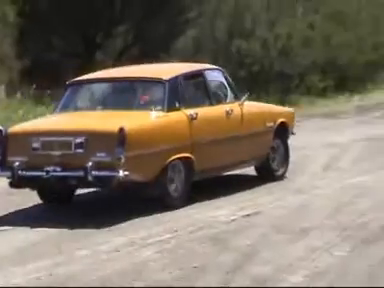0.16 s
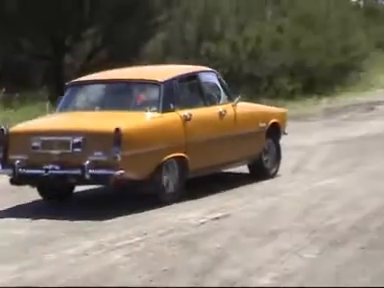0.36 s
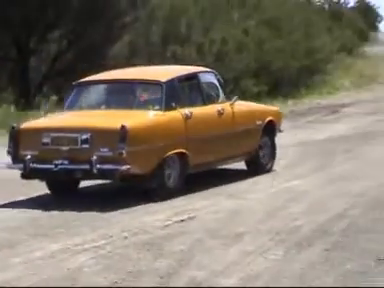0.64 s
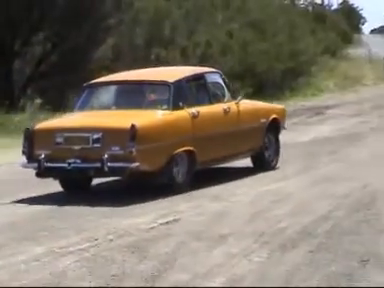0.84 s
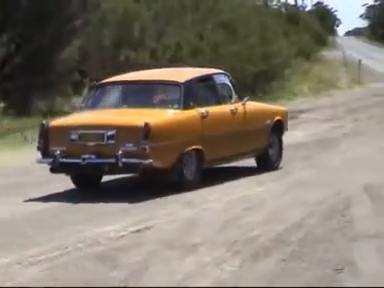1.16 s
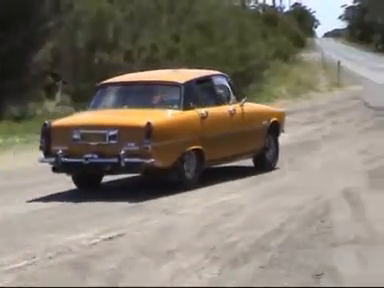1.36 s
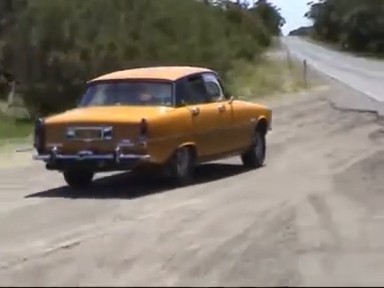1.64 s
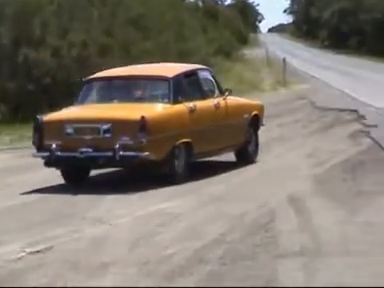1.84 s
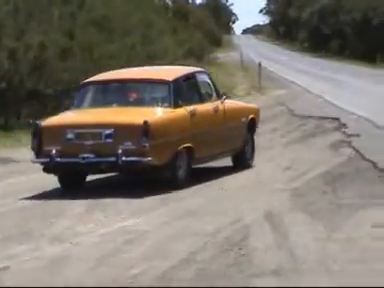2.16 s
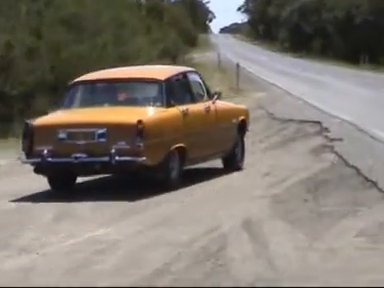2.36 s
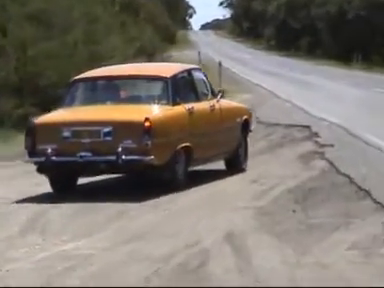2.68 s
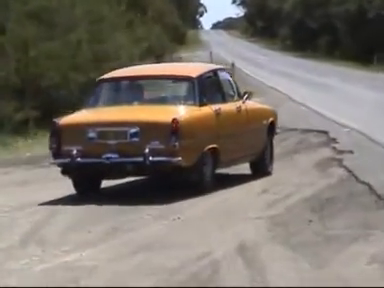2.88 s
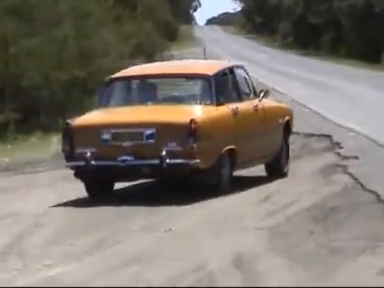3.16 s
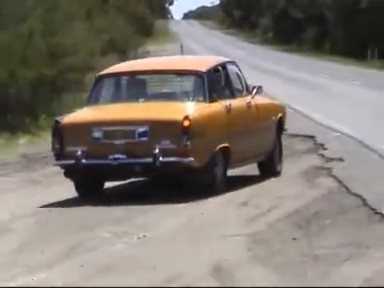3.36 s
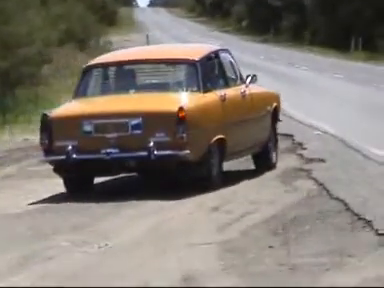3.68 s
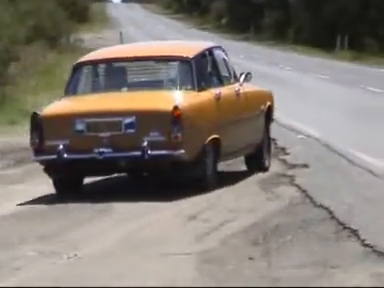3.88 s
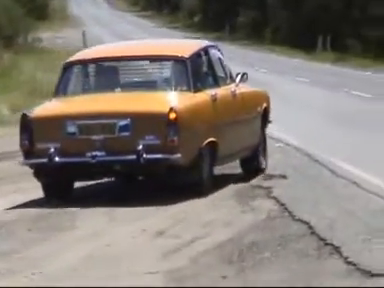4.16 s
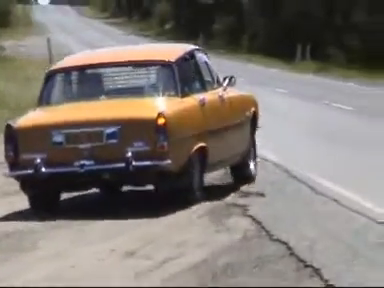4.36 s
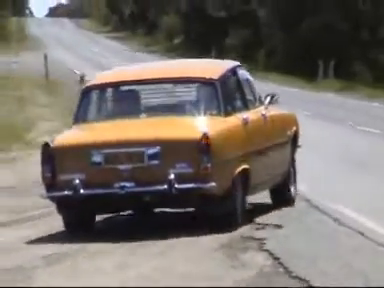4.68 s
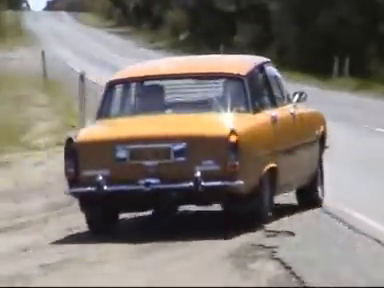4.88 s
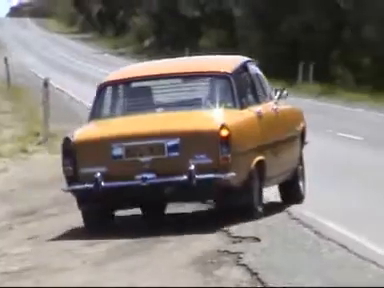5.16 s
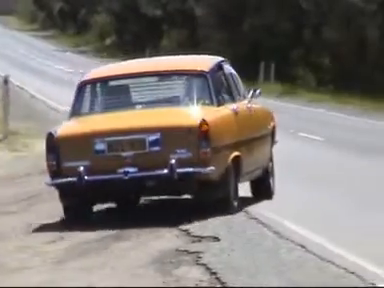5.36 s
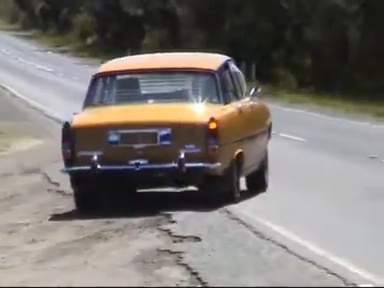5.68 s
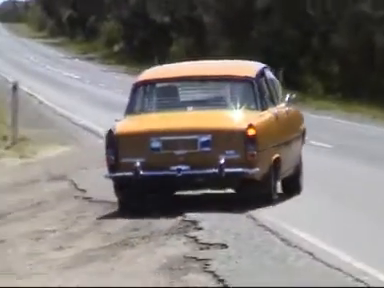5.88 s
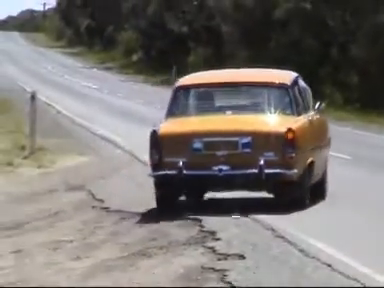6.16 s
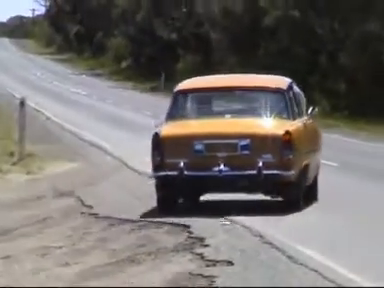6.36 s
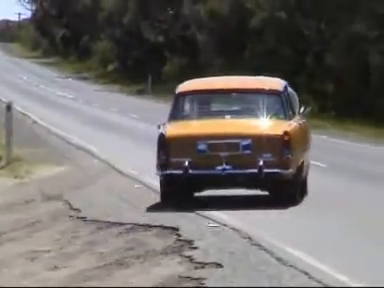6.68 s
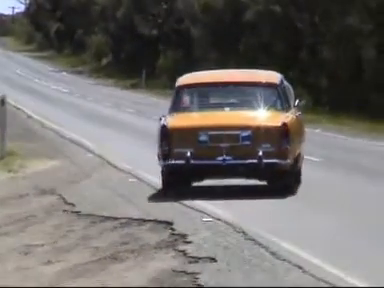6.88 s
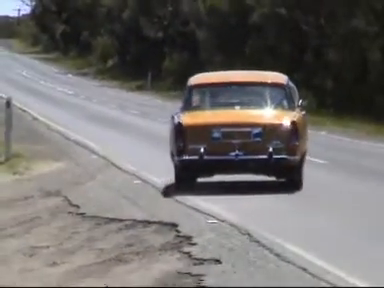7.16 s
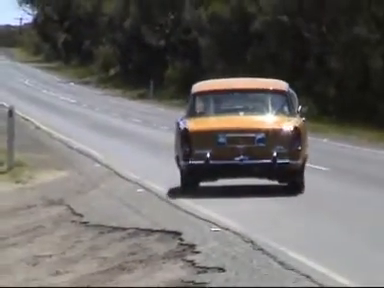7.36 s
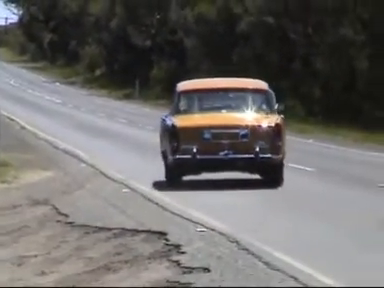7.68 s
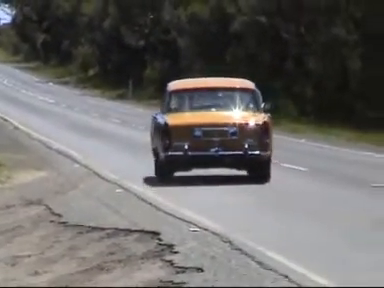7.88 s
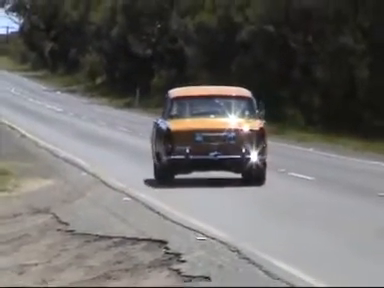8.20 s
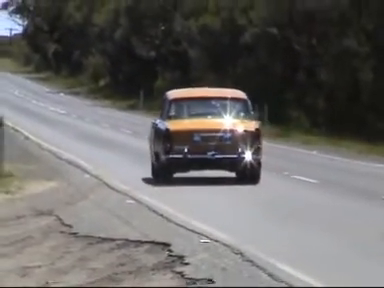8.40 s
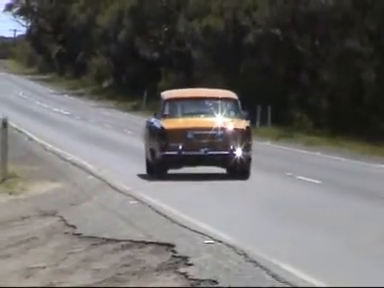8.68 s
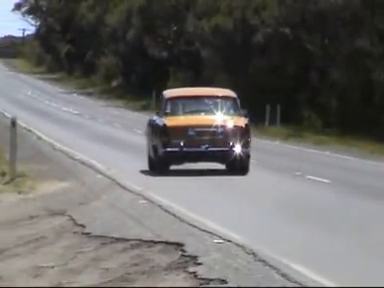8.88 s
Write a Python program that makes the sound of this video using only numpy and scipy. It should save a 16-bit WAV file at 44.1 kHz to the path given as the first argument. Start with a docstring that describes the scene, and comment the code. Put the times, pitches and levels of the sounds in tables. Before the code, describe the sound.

Open air beside a country road, microphone a few metres from an old V8 saloon, with faint low breeze and steady thin hiss. From 0 to 1.5 s the car rolls on light throttle, a mellow uneven burble over the fine, dry crunch of grit. Around 1.6 s the engine drops to a softer, lumpy, throbbing idle with chuffing puffs; stones snap and tick under the tyres, thickest near 2.1 to 2.8 s. At 3.4 s revs lift, and about 3.7 s a short rising gulp opens a louder, harder growl. A very brief falling squeak comes at 4.45 s, with further scrunches to 6.1 s. The engine eases in level from 5.5 to 7.2 s while its pitch climbs and grit sinks away, a last cluster of stone ticks near 6.4 s. From 7.4 s a second strong pull swells, throaty and raspy, still climbing until the end at 9 s.

```python
"""A V8 saloon burbles by on light throttle over gravel, drops to a throbbing idle, then blips and pulls away.
Eight uneven firings in two banks ring the exhaust pipe, and gas noise rasps at the tailpipe in puffs.
Grit crunches as many tiny cracks, with stones snapping as short bursts; a gulp of gas opens the pull.
A brief three-tone squeak follows, then the grit sinks low while the engine climbs in pitch.
Low breeze noise and a faint hiss run throughout."""
import sys
import numpy as np
from scipy import signal
from scipy.io import wavfile
from scipy.ndimage import uniform_filter1d

SR = 44100
rng = np.random.default_rng(int(sys.argv[2]) if len(sys.argv) > 2 else 0)


def unload_wav(signal):
    """Save mono or channel-first audio to the path in sys.argv[1] as 16-bit WAV at rate SR, clipped to [-1, 1]."""
    wavfile.write(
        sys.argv[1],
        SR,
        np.round(np.clip(np.atleast_2d(signal).T, -1, 1) * 32767).astype(np.int16),
    )


N = 398223  # samples, about nine seconds
CYCLE = 8  # firings in two crank turns
STEP = 10  # the exhaust tones are worked out at a tenth of the sample rate


def amp(db):
    """Turns dB into a plain factor."""
    return 10 ** (np.asarray(db) / 20)


def evened(x):
    """Scales a sound to an overall (RMS) level of 1."""
    return x / np.sqrt(np.mean(x ** 2) + 1e-20)


def smoothed(x, size):
    """Two running averages in a row leave only the slow changes."""
    return uniform_filter1d(uniform_filter1d(x, size), size)


def steadied(x, size=900):
    """Divides out the slow changes of level."""
    return x / np.sqrt(smoothed(x ** 2, size) + 1e-20)


def read(points, hz):
    """Reads a table of (Hz, value) along a logarithmic pitch scale."""
    f, value = np.transpose(points)
    return np.interp(np.log(hz + 1), np.log(f + 1), value)


def curves(rows, t):
    """Draws straight lines between the rows of a table that starts with seconds."""
    s, *columns = np.transpose(rows)
    return [np.interp(t, s, c) for c in columns]


def resonate(x, hz, width, sr):
    """Shifts the curve hz down to zero, smooths, and shifts back: a resonance of gain 1."""
    turn = np.exp(2j * np.pi * np.cumsum(hz) / sr)
    r = np.exp(-np.pi * width / sr)
    slant = 1 + 1j * width / (2 * hz)  # passes nothing at zero Hz
    return 2 * (slant * turn * signal.lfilter([1 - r], [1, -r], x / turn)).real


def resonate_twice(x, hz, width, sr):
    """Two equal resonances in a row, with steeper sides than one."""
    return resonate(resonate(x, hz, width, sr), hz, width, sr)


# How alike left and right are.
# Each row: frequency in Hz, likeness from 0 to 1.
LIKENESS = [(60, 0.47), (400, 1), (1000, 0.97), (2500, 0.92), (5000, 0.92), (8500, 0.63), (12000, 0.81)]


def coloured(x, spectrum, tilt_db=0, patchy_db=0, size=512):
    """Colours a sound and an unrelated twin, and mixes them into two partly alike channels."""
    hz, t, z = signal.stft(x, SR, nperseg=size, noverlap=size * 3 // 4)
    patches = uniform_filter1d(rng.standard_normal(z.shape[1:]), 8, 0)
    patches = evened(uniform_filter1d(patches, 16, 1))
    tilt_db = np.interp(t * SR, np.arange(N), tilt_db * np.ones(N))
    slope_db = np.log2(np.maximum(hz, 500) / 4000)[:, None] * tilt_db  # hinged at 4000 Hz
    z = z * amp(read(spectrum, hz)[:, None] + slope_db + patchy_db * patches)
    angle = np.arccos(np.clip(read(LIKENESS, hz), 0, 1))[:, None] / 2
    pair = np.cos(angle) * z[0] + np.sin(angle) * z[1] * np.array([1, -1])[:, None, None]
    return evened(signal.istft(pair, SR, nperseg=size, noverlap=size * 3 // 4)[1][:, :N])


def train(at, size, row, length):
    """One smooth pulse at each exact place, in one of two rows."""
    place = at.astype(int)[:, None] + np.arange(-8, 9)
    gap = place - at[:, None]
    shape = np.sinc(gap / 1.4) * np.cos(np.pi * gap / 18) ** 2
    pulses = np.zeros((2, length))
    np.add.at(pulses, (row[:, None], place), size[:, None] * shape)
    return pulses


def hiss(db=-72, band_db=-62, band_hz=5650, width=250):
    """A steady faint noise, with a thin band in the treble."""
    noise = rng.standard_normal((3, N))
    band = evened(resonate(noise[0], band_hz * np.ones(N), width, SR))
    wide = evened(noise[1] + .3 * noise[1:] * [[0], [1]])  # left and right differ a little
    return amp(db) * wide + amp(band_db) * band


def breeze(db=-65, top_hz=70, apart=0.84):
    """Wind on the microphone: low noise, partly different at each microphone port."""
    low = signal.sosfilt(signal.butter(3, top_hz, fs=SR, output="sos"), rng.standard_normal((3, N)))
    return amp(db) * evened(low[0] + apart * low[1:])


# The colour of the grit. Each row: frequency in Hz, level in dB (only the differences count).
GRIT_COLOUR = [(290, -41.5), (500, -30.5), (774, -13.5), (1110, -17.5), (1380, -11.5), (2720, -18.5),
               (4000, -17), (5500, -20.5), (6820, -29), (8870, -34), (12000, -46), (15500, -63)]


def grit(db, tilt_db, per_s=1800, spread_db=1.5, fizz=1.3, lumpy_db=0.81):
    """Many small stones crack under the tread, in clumps, over a fine hiss."""
    sizes = amp(spread_db * np.minimum(rng.exponential(1, (2, N)), 4))
    cracks = sizes * (rng.random((2, N)) < per_s / SR)
    cracks = evened(cracks * rng.standard_normal((2, N)))
    lumps = evened(smoothed(rng.standard_normal(N), 500))
    x = (cracks + fizz * rng.standard_normal((2, N))) * amp(lumpy_db * lumps)
    return amp(db) * coloured(x, GRIT_COLOUR, tilt_db, patchy_db=1.0)


# A tyre crunches over a heap of grit.
# Each row: middle in seconds, swell of the grit in dB, length in seconds, scrunch pitch in Hz,
# scrunch level in dB.
HEAPS = [(0.727, 2, 0.065, 4000, -58), (1.003, 3.5, 0.19, 3923, -61), (2.23, 1, 0.02, 1200, -43),
         (2.468, 3, 0.029, 6000, -55), (2.82, 5, 0.022, 4200, -49), (4.577, 5, 0.14, 4500, -54),
         (4.94, 3, 0.065, 5000, -52), (5.143, 1.5, .12, 7800, -58), (5.29, 1, 0.043, 4000, -56),
         (5.68, 2.5, 0.063, 4100, -51), (6.09, 4.5, 0.16, 3800, -54)]


def crunches(t, width=.25):
    """Each crunch rises and falls smoothly: the swell of the grit in dB, and noise round its own pitch."""
    swell_db, scrunch, noise = 0, np.zeros(N), rng.standard_normal(N)
    for s, db, length, hz, scrunch_db in HEAPS:
        bump = np.exp(-(2 * (t - s) / length) ** 2)
        near = abs(t - s) < .3
        swell_db = swell_db + db * bump
        band = evened(resonate(noise[near], hz * np.ones(near.sum()), width * hz, SR))
        scrunch[near] += amp(scrunch_db) * bump[near] * band
    return swell_db, scrunch


# Stones that snap from under the tyres.
# Each row: start in seconds, peak of the burst in dB before dulling, pitch in Hz.
SNAPS = [(0.49, -28, 1600), (1.496, -26, 3940), (1.5429, -29, 3000), (2.1311, -28, 4500),
         (2.222, -22, 1300), (2.345, -27, 4500), (2.447, -23, 1200), (2.4594, -25, 3000),
         (2.505, -18, 1280), (2.8185, -21, 4200), (3.2317, -32, 3040), (3.467, -25, 1770),
         (3.5284, -32, 1520), (3.815, -26, 1500), (5.3413, -21, 3500), (5.4194, -36, 4000),
         (6.0546, -33, 3800), (6.3515, -26, 4800), (6.358, -26, 1900), (6.361, -30, 4000),
         (6.402, -32, 4320), (6.4936, -30, 4600)]


def stones(t60=0.012, width=0.45, snap=4.0, crack_db=-6):
    """Each stone is a wide crack and a short burst of noise round its own pitch."""
    out, t = np.zeros(N), np.arange(1500) / SR
    for s, db, hz in SNAPS:
        blow = (rng.standard_normal(1500) + snap * (t == 0)) * amp(-60 * t / t60)
        burst = resonate(blow, hz * np.ones(1500), width * hz, SR)
        crack = np.diff(blow, prepend=0)
        sound = burst / abs(burst).max() + amp(crack_db) * crack / abs(crack).max()
        out[round(s * SR):][:1500] += amp(db) * sound
    return signal.sosfilt(signal.butter(3, 8500, fs=SR, output="sos"), out)  # dulled by distance


# A brief squeak.
# Each row: time in seconds, then pitch in Hz and level in dB for the low, the middle and the high tone.
SQUEAK_TONES = [(4.42, 2612, -62, 3900, -55, 6250, -58), (4.428, 2540, -60, 3800, -43, 6200, -50),
                (4.438, 2450, -52, 3380, -43, 6100, -44), (4.449, 2320, -39, 3220, -48, 5850, -41),
                (4.463, 1910, -42, 3100, -48, 5600, -43), (4.474, 1770, -33, 2950, -55, 6000, -38.5),
                (4.485, 1700, -50, 2900, -58, 5900, -55)]


def squeak(t, rough=0.65):
    """Two falling tones and a high one that dips and springs back, slightly unsteady in level."""
    tones = np.reshape(curves(SQUEAK_TONES, t), (-1, 2, N))
    on = (t > SQUEAK_TONES[0][0]) * (t < SQUEAK_TONES[-1][0])
    unsteady = 1 + rough * evened(uniform_filter1d(rng.standard_normal(N), 150))
    return on * unsteady * sum(amp(db) * np.sin(2 * np.pi * np.cumsum(hz) / SR) for hz, db in tones)


# A gulp of gas as the throttle opens.
# Each row: time in seconds, pitch in Hz, level in dB.
GULP = [(3.71, 420, -41), (3.735, 600, -34), (3.755, 870, -36), (3.78, 1100, -51)]


def whoop(t, width=110):
    """A short band of noise, rising in pitch."""
    hz, db = curves(GULP, t)
    on = (t > GULP[0][0]) * (t < GULP[-1][0])
    return on * amp(db) * evened(resonate_twice(rng.standard_normal(N), hz, width, SR))


# Between these two moments, in seconds, the tailpipe swings round to face the microphone.
SWING_S = (4.57, 7.53)
# The colour of the gas noise from behind, then from the side.
# Each row: frequency in Hz, level in dB (only the differences count).
RASP_BEHIND = [(250, -26.5), (340, -2.5), (430, -15), (490, -18.5), (630, -5.5), (980, -19.5), (1090, -13),
               (1160, -24), (1690, -24.5), (2100, -36), (2400, -26.5), (3070, -36.5), (5600, -37.5),
               (7000, -43), (9000, -55), (15500, -82)]
RASP_BESIDE = [(250, -20.5), (340, -4), (430, -9.5), (500, -26), (620, -10), (800, -13), (1050, -20),
               (1400, -22.5), (2100, -30.5), (3070, -35), (5600, -43.5), (7000, -43.5), (9000, -58.5),
               (15500, -79)]


def rasp(fired, db, puff=0.6, fade=0.8, puff_spread_db=1.5):
    """Gas noise that puffs at every firing, some puffs stronger; its colour changes with the swing."""
    sizes = amp(puff_spread_db * rng.standard_normal(1000))
    size = sizes[np.floor(fired + 8).astype(int)]
    gate = 1 + puff * size * np.exp(-(fired % 1) / fade)  # fade is in firings
    behind = np.interp(np.arange(N) / SR, SWING_S, [0, 1])
    side, back = (coloured(gate * rng.standard_normal((2, N)), tint, patchy_db=1.66, size=1024)
                  for tint in (RASP_BESIDE, RASP_BEHIND))
    return amp(db) * (np.sqrt(1 - behind) * side + np.sqrt(behind) * back)


# The idle tone throbs through two crank turns.
# Each row: firings into the cycle, throb in dB before each tone's own depth.
THROB = [(0.0, -3.5), (.5, -4.5), (1.9, 2.6), (2.7, -1), (3.3, -2.2), (4.2, -6), (5.0, -15), (6.0, -1.5),
         (6.7, -4.5), (7.3, -14)]
# Each row: multiple of the firing rate, level in dB beside the other tones, depth of its throb as a factor.
IDLE_TONES = [(1, -14, 0.13), (2, -13, 1), (3, 2, 1.0), (4, -21, .6)]
# Each cylinder's chuff, in firing order. Each row: strength in dB, delay in milliseconds.
CYLINDER_CHUFFS = [(-7.5, -5), (-10, -7), (-9.5, -2.5), (-10.5, -9.5), (-11.5, -4.5), (0.3, -6),
                   (1.3, -8.5), (-11, -9)]
# The bands the chuffs ring. Each row: pitch in Hz, half the width of each resonance in Hz, level in dB.
CHUFF_BANDS = [(252.3, 16, 1.5), (282, 13, 3), (324.6, 18, 0.5), (387, 14, -10), (430, 7.7, -16.5)]


def idle(t, fired, number, at, sr, waver_db=2.0, spread_db=2.5):
    """A throbbing tone on the firing rate, and uneven chuffs that ring a higher band."""
    place, db = np.transpose(THROB)
    throb_db = uniform_filter1d(np.interp(fired, place, db, period=CYCLE), 30)
    throb_db = throb_db + waver_db * evened(smoothed(rng.standard_normal(len(t)), 150))
    tone = sum(amp(db + depth * throb_db) * np.sin(2 * np.pi * round(k) * fired)
               for k, db, depth in IDLE_TONES)
    db, delay_ms = np.array(CYLINDER_CHUFFS)[number % CYCLE].T
    size = amp(db + spread_db * rng.standard_normal(len(at)))
    puffs = train(at + delay_ms * sr / 1000, size, 0 * number, len(t))[0]
    flat = np.ones(len(t))
    chuff = sum(amp(db) * resonate_twice(puffs, hz * flat, 2 * w, sr) for hz, w, db in CHUFF_BANDS)
    return steadied(tone), steadied(chuff)


# The ringing of the short tailpipe.
# Each row: pitch in Hz, half the width of each resonance in Hz, dB from the side, dB from behind.
TAILPIPE_MODES = [(287.5, 16.8, 12.5, 17.5), (373.5, 33, 3, -3), (431.6, 9.7, 6, -10), (483, 16, -20.5, 6),
                  (557, 23, -6, -0.5), (591, 28, -6.5, -1.5), (632, 40, -1.5, 2.5), (685, 35, -7.5, 0),
                  (775, 45, -6.5, -6.5), (856, 25, -10.5, -6.5), (1026.5, 27, -11.5, -1),
                  (1182, 32, -17.5, -10)]
# Two tailpipe modes that swell under load.
# Each row: time in seconds, lower pitch in Hz, its dB, upper pitch in Hz, its dB.
SWELLING_MODES = [(6.3, 602, -15, 1059, -13.5), (6.9, 617, -14, 1060, -3), (7.4, 600, 1.5, 1084, 0),
                  (7.75, 594, 6, 1070, 5.5), (8.0, 590, 4, 1100, -3.5), (8.3, 617, 7, 1087, 1),
                  (8.5, 628, 4, 1087, -6.5), (9.0, 640, 8.5, 1085, -4)]


def tailpipe(t, at, pulses, lead, sr, spread_db=3.5):
    """The sharp front of each pulse, some stronger, rings the short tailpipe."""
    front = pulses[0] + 0.56 * pulses[1]
    flat = np.ones(len(t))
    front = front * amp(spread_db * np.interp(t * sr + lead, at, rng.standard_normal(len(at))))
    behind = np.interp(t, SWING_S, [0, 1])
    high = 0
    for hz, w, side_db, back_db in TAILPIPE_MODES:
        db = side_db + behind * (back_db - side_db)
        high = high + amp(db) * resonate_twice(front, hz * flat, 2 * w, sr)
    for (hz, db), width in zip(np.reshape(curves(SWELLING_MODES, t), (2, 2, -1)), (90, 60)):
        high = high + amp(db) * resonate_twice(front, hz, width, sr)
    return steadied(high)


# The ringing of the exhaust pipe.
# Each row: pitch in Hz before the heat factor, width in Hz, then plain signed gains from the first and
# second bank: two for the hard note, two for the mellow note, two for the light-throttle note.
PIPE_MODES = [(51, 59, -0.23, 0.03, 0.13, 0.013, 0.034, 0.031),
              (117.7, 13.5, -0.7, -2, 0.24, 0.24, -0.012, -0.52),
              (157.9, 17.3, -1.39, -1.5, -0.007, 0.014, -0.33, -.49),
              (141.8, 49.8, -0.26, 0.55, -0.3, -0.19, -0.32, 0.044),
              (181.2, 37.7, 1.325, 0.38, 0.23, 0.094, 0.51, 0.19),
              (205.4, 8.5, 0.21, 0.04, 0.078, -0.1, -0.043, 0.24),
              (245.5, 12.5, 0.21, 0.99, 0.17, -0.074, 0.25, 0.16),
              (268.7, 7, -0.013, 0.9, 0.054, -0.18, 0.26, -0.112),
              (305.8, 23, -0.224, -0.1, 0.07, -0.0089, -0.148, 0.096),
              (361, 15, -0.087, 0.08, 0.045, 0.042, 0.026, -0.03),
              (407, 29, 0.086, 0.093, -0.031, -0.059, 0.056, 0.018),
              (415.6, 38, -0.076, -0.03, -0.024, 0.05, -0.032, -0.022)]


def pipe(pulses, notes, heat, sr):
    """Each bank drives the pipe's resonances in its own way; heat raises or lowers their pitch."""
    low = 0
    for hz, width, *gains in PIPE_MODES:
        drive = np.reshape(gains, (-1, 2)).T @ notes * pulses
        low = low + resonate(drive.sum(0), hz * heat, width, sr)
    # the open end radiates little bass, and the silencer swallows the top
    low = signal.sosfilt(signal.butter(2, 70, "high", fs=sr, output="sos"), low)
    return signal.sosfilt(signal.butter(4, 520, fs=sr, output="sos"), low)


# The engine speed. Each row: time in seconds, firings per second.
FIRING_RATE = [(0.0, 64.0), (1.45, 65.17), (1.75, 56.29), (3.1, 54.54), (3.46, 61.84), (3.58, 66.17),
               (3.82, 83.98), (4.5, 85.47), (4.82, 81.86), (5.14, 83.7), (5.3, 88.37), (5.78, 92.24),
               (6.1, 100.93), (6.26, 100.25), (6.58, 108.21), (6.9, 106.82), (7.22, 109.83), (7.38, 117.89),
               (8.0, 125.47), (9.03, 132.1)]
# Cruising, idle, a blip, first pull, easing, second pull.
# Each row: time in seconds, level in dB of the exhaust.
EXHAUST_LEVEL = [(0.05, -16), (1.09, -17), (1.5, -20), (1.75, -24), (2.3, -23.5), (2.95, -26.5),
                 (3.3, -21.5), (3.42, -21), (3.53, -21.5), (3.6, -21), (3.68, -12), (3.79, -13.5),
                 (4.88, -16), (5.48, -16), (5.9, -20), (6.2, -18), (6.64, -21.5), (7.19, -21.5),
                 (7.56, -14), (7.96, -12.5), (8.95, -14.5)]
# Each row: time in seconds, pipe heat as a factor on pitch, second bank against the first in dB,
# note from mellow 0 to hard 1, how unlike the cylinders fire as a factor.
EXHAUST_NOTE = [(0.5, 0.94, 2.8, 0.025, 0.74), (1.3, 0.94, 4.5, 0.05, 0.74), (1.9, 0.9, -3, 0.19, 0.9),
                (2.5, 0.9, -1, 0.18, 0.8), (3.2, 1, -9, 0.076, 1), (3.5, 0.91, 2, 0.36, 0.85),
                (3.6, 0.9, 0, 0.83, 0.46), (3.7, 1, -4.5, 0.75, 0.33), (3.8, 0.98, 0.3, 0.58, 1),
                (4.2, 1.01, 1.3, 0.75, 0.98), (5.0, 1.06, 2, 0.72, 0.73), (5.6, 1.055, 2.5, 0.46, 1),
                (6.4, 1.077, -2.5, 0.79, 0.89), (6.9, 1.03, 1, 0.8, 0.78), (7.5, 0.98, 2.5, 0.41, 0.81),
                (7.85, 1.065, 3.5, 0.31, 0.76), (8.2, 1.026, -1, 0.37, 0.83), (8.6, 1.086, 3, 0.34, 0.82),
                (9.0, 1.07, 4.5, 0.31, 0.77)]
# Between these two moments, in seconds, the light-throttle note gives way to the mellow one.
CRUISE_END_S = (1.58, 2)
# The bank of each cylinder, 0 or 1, in firing order.
CYLINDER_BANKS = [0, 1, 0, 0, 1, 0, 1, 1]
# One row a cylinder, in firing order: strength in dB and delay in milliseconds for the hard note, then
# for the mellow note, then for the light-throttle note, all before the factor for unlike cylinders.
CYLINDER_FIRINGS = [(-6.5, 0.13, 0.6, 0.98, 5.3, 0.62), (0.2, -0.2, 2.5, 1.14, -3.3, 0.32),
                    (-1, 0.45, 3.5, -0.39, 3, -0.45), (1, -0.77, 2.2, 0.93, 5.8, 0.23),
                    (0, 0.98, 4.5, 1.65, 3.5, 1.5), (-1, -0.18, 2.5, 0.87, 1.3, 0.33),
                    (1, 0.58, 1, -0.21, -0.3, 0.11), (4.5, -0.23, 3.5, -0.11, 4, -0.21)]
# With the throttle shut.
# Each row: time in seconds, share of the idle tone from 0 to 1, chuff in dB against the exhaust level.
IDLE_MIX = [(1.5, 0, -27), (1.75, 0.81, -13), (2.0, 0.93, -6), (2.5, 0.93, -6.5), (3.05, 0.9, -5.5),
            (3.25, 0.84, -8), (3.4, .3, -12), (3.5, 0.01, -30)]


def exhaust(uneven_db=.6, first=.66):
    """One pulse a firing, uneven from cylinder to cylinder, drives the pipe and the tailpipe."""
    sr = SR / STEP
    lead = int(sr // 4)  # a quarter second of run-up, cut off at the end
    t = np.arange(-lead, N // STEP + 2) / sr
    (rate,), (db,) = curves(FIRING_RATE, t), curves(EXHAUST_LEVEL, t)
    heat, bank_db, hard, lumpy = curves(EXHAUST_NOTE, t)
    hard, light = np.clip(hard, 0, 1), np.interp(t, CRUISE_END_S, [1, 0])
    notes = np.array([hard, (1 - hard) * (1 - light), (1 - hard) * light])

    # count the firings, and find where each whole number falls
    fired = np.cumsum(rate) / sr
    fired -= fired[lead] + CYCLE * first
    number = np.arange(np.ceil(fired[0]) + 2, fired[-1] - 2).astype(int)
    at = np.interp(number, fired, np.arange(len(t)))

    moment = at.astype(int)
    cylinder = np.reshape(CYLINDER_FIRINGS, (CYCLE, -1, 2))[number % CYCLE]
    blend = np.einsum("nk,knc->ck", notes[:, moment], cylinder)  # mixes the three notes
    strength_db, delay_ms = lumpy[moment] * blend
    size = amp(strength_db + uneven_db * rng.standard_normal(len(at)))
    bank = np.array(CYLINDER_BANKS)[number % CYCLE]
    pulses = train(at + delay_ms * sr / 1000, size, bank, len(t))
    pulses[1] *= amp(bank_db)

    low = pipe(pulses, notes, heat, sr)
    share, chuff_db = curves(IDLE_MIX, t)
    share = np.clip(share, 0, 1)
    tone, chuff = idle(t, fired, number, at, sr)
    low = np.sqrt(1 - share) * steadied(low) + np.sqrt(share) * tone + amp(chuff_db) * chuff
    tones = np.array([amp(db) * low, tailpipe(t, at, pulses, lead, sr)])
    tones = signal.resample_poly(tones[:, lead:], STEP, 1, axis=1)[:, :N]
    return tones, np.interp(np.arange(N) / SR, t, fired)


# Each row: time in seconds, level in dB of the gas noise.
RASP_DB = [(0.1, -32.5), (1.14, -34.5), (1.7, -36), (2.6, -39.5), (3.55, -40), (3.65, -40), (3.76, -36.5),
           (3.9, -36), (5.0, -38.5), (5.9, -36), (6.67, -38), (7.2, -36), (7.5, -33.5), (8.2, -33),
           (8.95, -35)]
# Each row: time in seconds, level in dB of the grit before its swells, brightness in dB per octave.
GRIT_DB = [(0.05, -37.5, 1), (1.0, -38.5, 1.4), (2.3, -38.5, 0.5), (3.3, -42.5, -0.6), (4.06, -39.5, -1),
           (4.6, -41.5, 2), (4.95, -46, 1), (5.3, -44.5, 4.5), (5.6, -47, 0), (6.3, -53, 1.5),
           (6.6, -50.5, 0)]
# The faster the engine turns, the more of the rasp is clean firing tone. The first level holds at the
# reference rate, in firings per second, a little above idle.
CLEAN_DB, CLEAN_DB_PER_OCTAVE, REFERENCE_PER_S = -3.5, 9, 61


def scene():
    """Adds the car, a little to the left, to the wider rasp, grit, breeze and hiss."""
    t = np.arange(N) / SR
    (low, high), fired = exhaust()
    (rasp_db,), (rate,) = curves(RASP_DB, t), curves(FIRING_RATE, t)
    clean_db = CLEAN_DB + CLEAN_DB_PER_OCTAVE * np.log2(rate / REFERENCE_PER_S)
    grit_db, tilt_db = curves(GRIT_DB, t)
    swell_db, scrunch = crunches(t)
    near = scrunch + low + amp(rasp_db + clean_db) * high + stones() + squeak(t) + whoop(t)
    late = np.r_[np.zeros(2), near[:-2]]  # the right hears it two samples later
    near = np.array([near, late]) * amp([[.45], [-.45]])  # dB, left and right
    return near + rasp(fired, rasp_db) + grit(grit_db + swell_db, tilt_db) + breeze() + hiss()


def record(dry, edge_hz=15700):
    """A steep filter removes everything far above the edge."""
    low_pass = signal.firwin(511, edge_hz, window=("kaiser", 9), fs=SR)
    return signal.oaconvolve(dry, low_pass[None], "same")


dry = scene()
out = record(dry)
unload_wav(out)
```